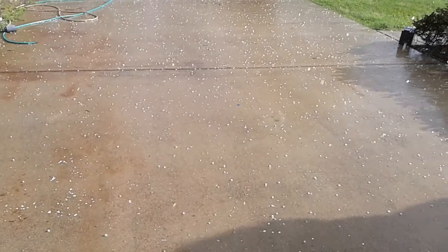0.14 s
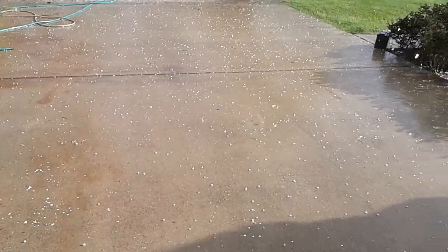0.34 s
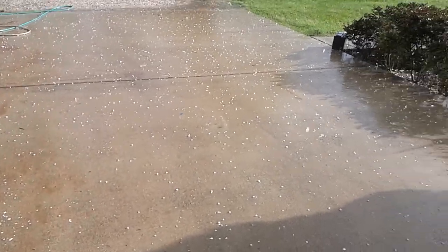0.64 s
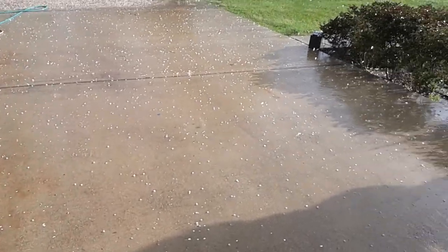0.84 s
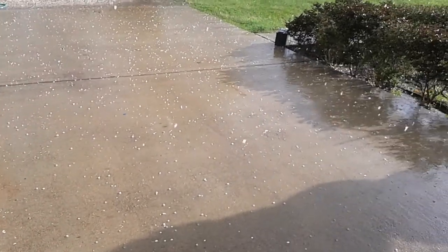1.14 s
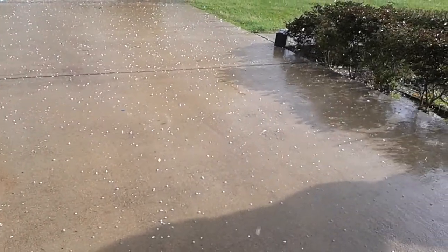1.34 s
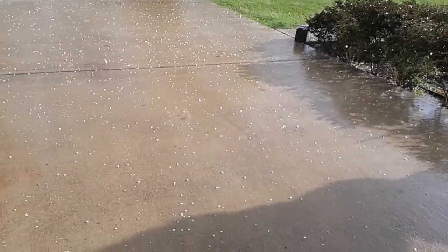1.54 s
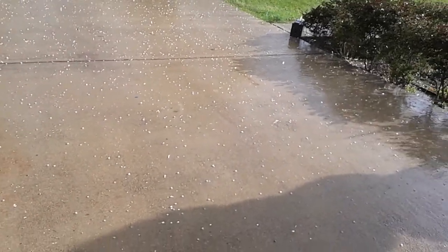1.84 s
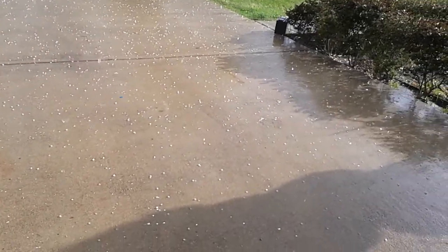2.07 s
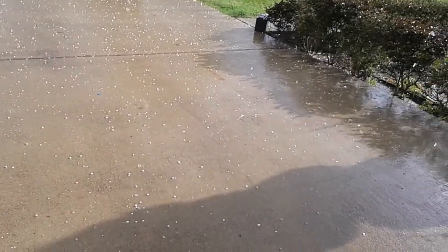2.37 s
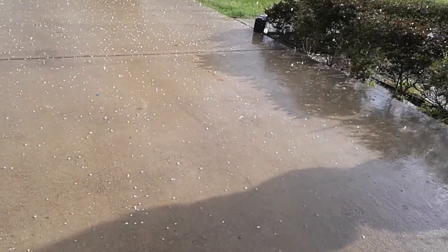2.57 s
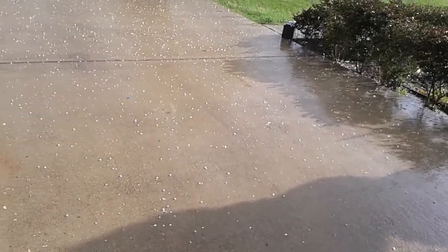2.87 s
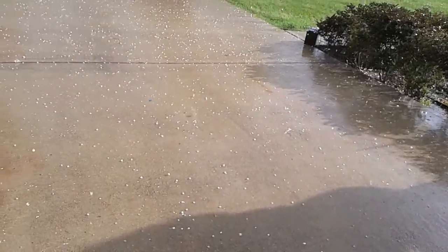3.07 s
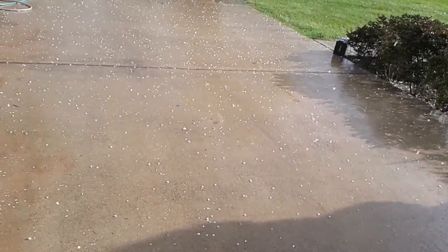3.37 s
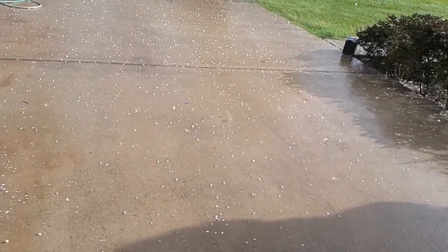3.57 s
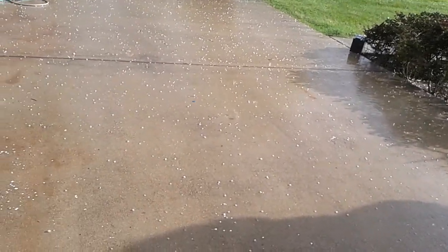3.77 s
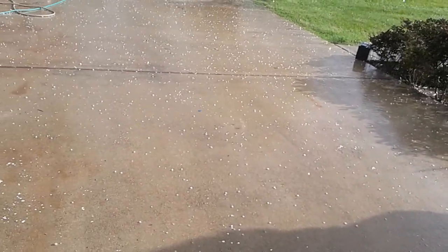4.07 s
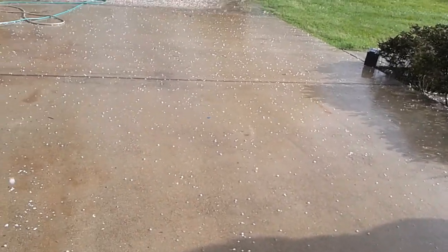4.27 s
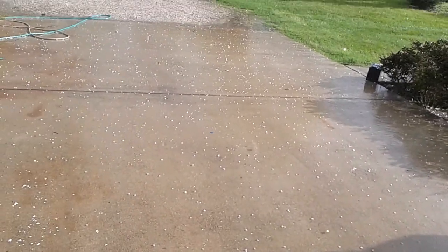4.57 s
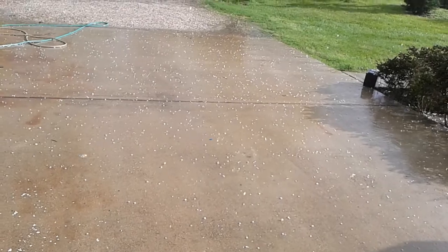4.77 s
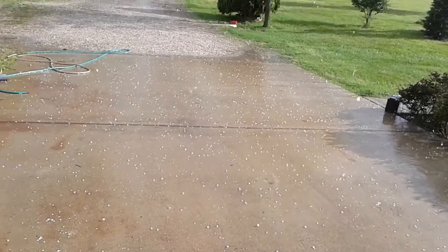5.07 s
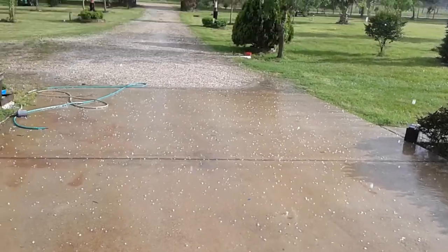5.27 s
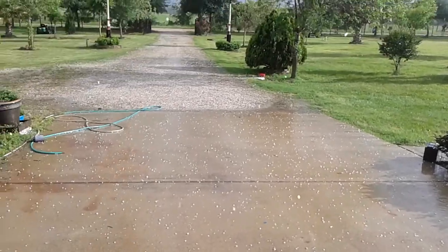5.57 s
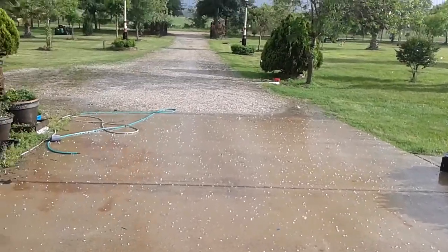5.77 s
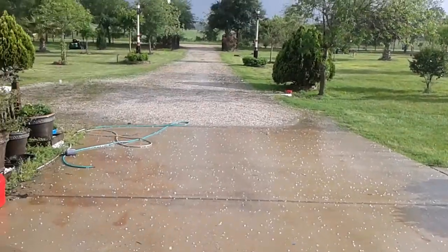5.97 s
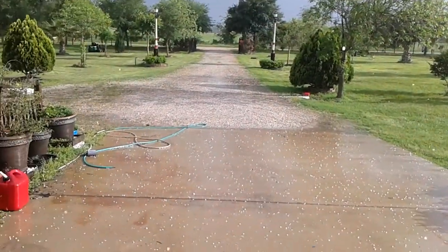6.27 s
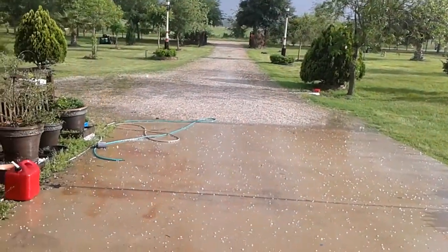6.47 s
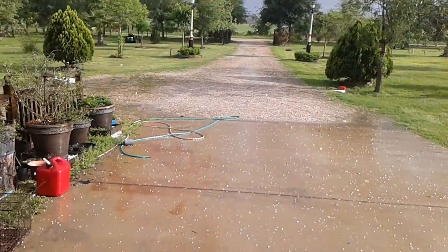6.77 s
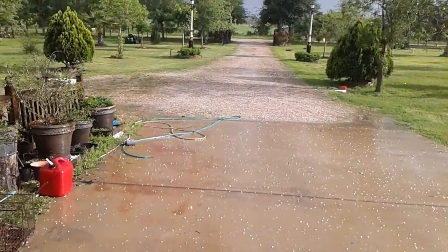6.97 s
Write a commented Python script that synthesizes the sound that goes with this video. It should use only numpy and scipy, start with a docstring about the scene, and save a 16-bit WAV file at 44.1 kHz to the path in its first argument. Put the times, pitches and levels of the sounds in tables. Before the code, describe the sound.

Small hail and rain fall on a wet concrete driveway, heard in bright, crisp stereo from the mouth of a garage with a short, dull echo. At 0 s it is dense: a broad far hiss, low roof murmur, quick pattering and sharp icy ticks, strong near 0.2, 0.3 and 0.5 s. From 0.8 s, just after which a panel clacks, it thins to lighter hiss and scattered clicks until 2 s. Then bursts return, around 2.2 and 2.9 s, with close cracks, fizzing little splashes and rattling panel clacks. Between 3 and 5 s uneven patter continues, with faint pings from struck objects and hard ticks around 4.3 to 4.7 s. It eases near 5.3 s. The hardest, hollow knock lands at 5.8 s; close ticks crowd together around 6.4 s, and more clacks at 6.8 s lead into steady patter through 7 s.

```python
"""Small hail and rain fall on a concrete driveway, heard from the mouth of a garage.
It opens dense, over a far hiss and a low roof murmur, and thins out from about 0.8 s.
From 2 s it comes back in bursts, with nearer stones pattering and the closest ticking or splashing.
Throughout, big stones clack on the building's panels; the hardest knock comes at 5.8 s.
Close ticks crowd together around 6.4 s. Stones are filtered clicks; the rest is shaped noise and tones."""
import sys
import numpy as np
from scipy import signal
from scipy.fft import rfft, irfft
from scipy.io import wavfile
from scipy.ndimage import uniform_filter1d, minimum_filter1d

SR = 44100
rng = np.random.default_rng(int(sys.argv[2]) if len(sys.argv) > 2 else 0)


def wav_out(sig):
    """Save sig, one row per channel (or a flat mono array), as 16-bit PCM at SR to the path in sys.argv[1]."""
    wavfile.write(sys.argv[1], SR, np.round(np.clip(np.atleast_2d(sig).T, -1, 1) * 32767).astype(np.int16))


N = 314433  # length in samples
PORT_DELAY_S = .00039  # sound's travel time from one microphone port to the other


def amp(db):
    """Turns decibels into a gain."""
    return 10 ** (np.asarray(db) / 20)


def unit_rms(x):
    """Scales a sound to a mean power of one."""
    return x / np.sqrt(np.mean(x ** 2) + 1e-20)


def read(points, hz):
    """Reads a table of (Hz, value) along a logarithmic pitch axis."""
    f, value = np.transpose(points)
    return np.interp(np.log(hz + 1), np.log(f), value)


def curve(points):
    """Reads a table of (seconds, value) at every sample."""
    return np.interp(np.arange(N) / SR, *np.transpose(points))


def add(mix, s, sound):
    """Mixes a stereo sound in at s seconds."""
    part = mix[:, max(round(s * SR), 0):][:, :sound.shape[1]]
    part += sound[:, :part.shape[1]]


def colour(x, points, size=2048):
    """Filters with the given (Hz, dB) response; nothing sounds before its cause."""
    log_gain = np.log(amp(read(points, abs(np.fft.fftfreq(size, 1 / SR)))))
    # minimum phase: the phase follows from the log gain
    taps = np.fft.ifft(np.exp(np.conj(signal.hilbert(log_gain)))).real
    return signal.oaconvolve(x, taps[None, :size // 2], axes=1)[:, :x.shape[1]]


def diffuse(size):
    """Noise from all sides: alike at both ports in the bass, mostly unrelated in the treble."""
    a, b = rfft(rng.standard_normal((2, size)))
    same = np.sinc(2 * PORT_DELAY_S * np.fft.rfftfreq(size, 1 / SR)) * .96
    return irfft(np.array([a, same * a + np.sqrt(1 - same ** 2) * b]), size)


def wander(per_s):
    """A random curve of unit rms that heads for a new value per_s times a second."""
    knots = rng.standard_normal(N // 16)
    return unit_rms(np.interp(np.arange(N) / SR * per_s, np.arange(len(knots)), knots))


# How loud the roof drums over time. Each row: time in seconds, relative level in dB.
ROOF_LEVEL = [(0, -40), (.62, -45.5), (1.35, -56.5), (2.25, -46), (2.85, -50.5), (3.7, -46.5),
              (4.65, -51.5), (5.6, -50), (5.88, -43), (6.3, -47), (7.13, -41.5)]
# What the roof lets through. Each row: frequency in Hz, gain in dB.
ROOF_COLOUR = [(20, -30), (40, -54), (60, -8), (90, -0.5), (120, 3.5), (170, -1), (230, -8.5), (400, -11),
               (1000, -19.5), (4000, -89)]


def drumming(db=3):
    """The roof passes on only the low murmur of the stones: noise stripped of its treble."""
    murmur = unit_rms(colour(diffuse(N), ROOF_COLOUR, size=8192))
    return murmur * amp(db + curve(ROOF_LEVEL))


# Tone of the far hiss. Each row: frequency in Hz, gain in dB.
HISS_COLOUR = [(40, -21.5), (250, 2.5), (550, 2), (1000, 2.5), (1550, 4.5), (2000, 9), (3000, 4.5),
               (4500, 5), (8000, -2.5), (15000, -6.5)]


def hiss(level, db=-8, per_s=60, swell=1.0, fade_s=0.019, grain_db=1.5):
    """Far stones and rain, too many to tell apart; larger ones lift the hiss at once, then it fades."""
    lands = (rng.random(N) < per_s / SR) * np.minimum(rng.exponential(1, N), 3)
    power = 1 + swell * signal.lfilter([1], [1, -np.exp(-1 / (fade_s * SR))], lands)
    steady = colour(diffuse(N), HISS_COLOUR)
    return steady * amp(db + level + grain_db * wander(600)) * np.sqrt(power)


def ring(hz, t60, split=0.0447, rise_s=0.00091, size=6144):
    """Something small and hard rings in a close pair of modes, blurred by its own rattling."""
    t = np.arange(size) / SR
    late = t + PORT_DELAY_S * rng.random((2, 1))
    upper = hz * (1 + split * rng.uniform(0.67, 1.55))
    # the pitch jitters at random, which widens each mode
    width_hz = 60 + .06 * hz
    blur = np.cumsum(rng.standard_normal((2, size)), axis=1) * np.sqrt(2 * np.pi * width_hz / SR)
    main_mode = np.sin(2 * np.pi * hz * late + blur[0])
    upper_mode = .5 * np.sin(2 * np.pi * (upper * late + rng.random()) + blur[1])
    return (main_mode + upper_mode) * (1 - np.exp(-t / rise_s)) * amp(-60 * t / t60)


def plinks(level, low_hz, high_hz, per_s, db, t60, spread_db=0.5, count=900):
    """Faint rings at random moments, each at a pitch of its own."""
    out = np.zeros((2, N))
    chances, pitches, sizes = rng.random((count, 3)).T
    starts = np.cumsum(-np.log(1 - chances)) / per_s
    for s, pitch, bulk in zip(starts, pitches, sizes):
        if s < N / SR:
            hz = low_hz * (high_hz / low_hz) ** pitch
            plink_db = db + level[int(s * SR)] + spread_db * 2 * (bulk ** 2 + 1.0)
            add(out, s, ring(hz, t60, size=3072) * amp(plink_db))
    return out


def stone(bright_db, pan_db, shatter=.13, shatter_s=.001, ring=.2, ring_s=.0006, size=320):
    """One impact: a sharp contact, cracking ice and a brief ring, higher for small bright stones."""
    t, hz = np.arange(size) / SR, np.fft.rfftfreq(size, 1 / SR)
    bright_db = np.clip(bright_db, -8, 12)
    ring_hz = 5100 * 2 ** (bright_db / 48 + rng.uniform(-0.35, 0.27))
    crack = (t == 0) + shatter * rng.standard_normal(size) * np.exp(-t / shatter_s)
    spectrum = rfft(crack + ring * np.cos(2 * np.pi * ring_hz * t) * np.exp(-t / ring_s))
    # strength is reckoned in one band, before the tilt in dB per octave
    spectrum /= np.sqrt(np.mean(abs(spectrum[(hz > 3500) & (hz < 6000)]) ** 2))
    spectrum *= amp(bright_db * np.log2(np.clip(hz, 4000, 10000) / 4600))
    # the nearer port hears it louder and sooner
    side = np.array([[1], [-1]])
    delay = PORT_DELAY_S * (1 - side * np.clip(pan_db / 10, -1, 1) ** 3 / 2)
    return irfft(spectrum * np.exp(-2j * np.pi * hz * delay), size) * amp(side * pan_db / 2)


# Tone of the nearer stones. Each row: frequency in Hz, gain in dB.
PATTER_COLOUR = [(100, -1.5), (800, 1.5), (2000, -10), (4500, 7.5), (8000, -4.5), (15000, -4)]


def patter(level, per_s, db, spread_db, count=32):
    """Stones land at random; each kind has its own crack and direction, small ones outnumber large."""
    out = np.zeros((2, N))
    lands = rng.random(N) < per_s / SR
    bulk = np.minimum(rng.exponential(1, N), 2.5)
    sizes = amp(db + level + spread_db * bulk) * lands
    kind = rng.integers(0, count, N)
    for k, bright_db in enumerate(np.linspace(-4, 6, count)):
        impact = stone(bright_db, rng.normal(0, 2.4))
        left, right = signal.oaconvolve((sizes * (kind == k))[None], impact, axes=1)[:, :N]
        # they fall on all sides, so either port may lead
        out += [np.roll(left, round(rng.uniform(-1, 1) * PORT_DELAY_S * SR)), right]
    return colour(out, PATTER_COLOUR)


# Stones that set something ringing, such as pots or trim; the low rows (below about 1 kHz) are panels ringing
# under big knocks. # Each row: start in seconds, pitch in Hz, relative level in dB.
PING_HITS = [(.117, 2415, -17.5), (2.284, 4560, -18), (2.333, 1760, -23), (2.575, 1012, -20.5),
             (3.546, 1770, -17.5), (3.609, 2090, -21.5), (3.648, 1980, -23.5), (3.967, 1954, -20),
             (4.134, 2030, -17), (4.738, 510, -26.5), (5.795, 412, -22), (6.282, 1986, -17.5),
             (6.503, 480, -26.5), (6.566, 478, -24.5), (6.775, 906, -20), (6.807, 2020, -15)]


def pings(db=-1, t60=.09):
    """The clearest rings: stones that hit a loose object, and panels ringing low under some big knocks."""
    out = np.zeros((2, N))
    for s, hz, level_db in PING_HITS:
        add(out, s, ring(hz, t60) * amp(db + level_db))
    return out


# Big stones on the panels. Each row: start in seconds, strength in dB,
# hardness in dB (a harder blow has more clack and rattle and less thump).
PANEL_KNOCKS = [(.038, -23, -10), (.123, -24.5, -5), (.618, -26.5, -2.5), (0.8579, -19, -1),
                (2.32, -18.5, -1), (2.464, -20, 1.5), (2.548, -23, -4.5), (2.572, -24.5, -3.5),
                (2.832, -28, -4), (2.921, -26, 4.5), (3.172, -26, 0.5), (3.538, -23.5, -1),
                (3.608, -30.5, -3), (3.694, -18.5, -3.5), (3.95, -25.5, 0), (4.047, -20, -0.5),
                (4.122, -24.5, -1.5), (4.302, -25, 2.5), (4.58, -20, -0.5), (4.735, -30.5, 1.5),
                (4.864, -26.5, -5), (5.014, -25, -2.5), (5.383, -27.5, 2.5), (5.791, -12.5, -5.5),
                (6.277, -22.5, -1), (6.501, -29, -17), (6.563, -20.5, -1), (6.77, -17.5, -1.5),
                (6.806, -18, -5.5), (6.913, -26.5, -1), (7.1, -26, -0.5)]
# The panels' low modes, before a small random shift. Each row: pitch in Hz, level in dB.
LOW_MODES = [(332, -16), (408, -2.5), (507, -1.5), (549, 3.5), (646, -4.5), (908, -5), (1023, 3.5),
             (1195, -12), (1590, -9)]
# The panels' dense ringing. Each row: frequency in Hz, gain in dB.
BODY_COLOUR = [(60, -69), (200, -12), (400, -9), (800, 4.5), (1300, 2.5), (2500, -8), (5000, -82),
               (15000, -77)]
# The panels' bright rattle. Each row: frequency in Hz, gain in dB.
RATTLE_COLOUR = [(40, -34), (200, -0.5), (900, -17), (2000, 6), (4000, 4.5), (6500, 0.5), (9000, -6.5),
                 (15000, -10)]
# The clack of stone meeting panel. Each row: frequency in Hz, gain in dB.
CLACK_COLOUR = [(60, -40), (400, -4), (900, -2), (2000, 1), (5000, -15), (15000, -28)]
REBOUND_S, REBOUND_DB = .011, -4.5  # chatter: average time between contacts, change at each
BOUNCE_S, BOUNCE_DB = .075, -16  # the stone lands again about this much later, and weaker
WALL_S, WALL_DB, WALL_T60 = 0.015, -3, 0.08  # the back wall's return: delay, level, decay in s
THUMP_T60_S = .17
THUMP_PER_HARDNESS = -0.71  # dB of thump for each dB of hardness


def knocks(body_db=2.0, rattle_db=0.5, thump_db=-17.0, clack_db=30, rise_s=0.0017,
           soft_rise_s=0.00032, body_t60=0.27, rattle_t60=0.26, grain_db=3.0, spot_db=0.5,
           count=4, size=16384):
    """Big stones clack and chatter; panel modes swell, slower if soft, and vary from spot to spot."""
    t = np.arange(size) / SR
    body, rattle, thump, clack = np.zeros((4, 2, N))
    for start, strength_db, hard_db in PANEL_KNOCKS:
        rise = 1 - np.exp(-t / (rise_s + soft_rise_s * np.clip(-hard_db, 0, 10)))
        bright_db = strength_db + hard_db

        gaps = REBOUND_S * rng.uniform(.5, 1.5, count)
        for k, s in enumerate(start + np.cumsum(gaps) - gaps[0]):
            contact_db = clack_db + bright_db + k * REBOUND_DB
            add(clack, s, stone(0, rng.normal(0, 6.1)) * amp(contact_db))

        again = start + BOUNCE_S * rng.uniform(.7, 1.3)
        for s, db in (start, strength_db), (again, strength_db + BOUNCE_DB):
            add(body, s, diffuse(size) * rise * amp(body_db + db - 60 * t / body_t60))
            rattle_fade = amp(rattle_db + db + hard_db - 60 * t / rattle_t60)
            add(rattle, s, diffuse(size) * rise * rattle_fade)
        wall_fade = amp(WALL_DB + bright_db - 60 * t / WALL_T60)
        add(rattle, start + WALL_S, diffuse(size) * rise * wall_fade)

        low_db = thump_db + strength_db + THUMP_PER_HARDNESS * hard_db
        for hz, db in LOW_MODES:
            late = t + PORT_DELAY_S * rng.uniform(-0.69, 1.0, (2, 1))
            turns = hz * rng.uniform(0.94, 1.04) * late + rng.random()
            mode_db = low_db + db + spot_db * rng.uniform(-4.2, 1)
            add(thump, start, np.sin(2 * np.pi * turns) * rise * amp(mode_db - 60 * t / THUMP_T60_S))
    grain = amp(grain_db * wander(450))
    ringing = colour(body * np.sqrt(grain), BODY_COLOUR) + colour(rattle * grain, RATTLE_COLOUR)
    return colour(clack, CLACK_COLOUR) + ringing + thump


# Stones that burst into ice and water. Each row: start in seconds, relative level in dB.
BURSTS = [(0.102, -42.5), (0.192, -44.5), (0.619, -43), (2.215, -38), (2.258, -39), (2.469, -40),
          (2.835, -41), (3.951, -36.5), (4.056, -45), (4.866, -37.5), (5.389, -39.5), (6.558, -45),
          (6.691, -39.5)]
# The fizz of a splash. Each row: frequency in Hz, gain in dB.
SPRAY_COLOUR = [(500, -4.5), (2500, 20), (5000, 20.5), (8000, 18), (15000, 14.5)]


def splashes(db=-1, rise_s=0.00023, t60=0.23, grain_db=3, size=8192):
    """Fragments and droplets scatter over the wet concrete in a short, grainy fizz."""
    t, out = np.arange(size) / SR, np.zeros((2, N))
    for s, level_db in BURSTS:
        fade = (1 - np.exp(-t / rise_s)) * amp(db + level_db - 60 * t / t60)
        add(out, s, diffuse(size) * fade)
    return colour(out * amp(grain_db * wander(700)), SPRAY_COLOUR)


# Close stones on the concrete. Each row: time in seconds, strength in dB,
# brightness in dB per octave (stone() limits it), left minus right in dB.
CLOSE_STONES = [(0.0095, 0.5, -7, 2), (0.0316, 7, -7, 5.5), (0.0715, 4.5, 4, 3.0), (0.1764, 14, -2, 4.5),
                (0.2477, 0, -11, 5), (0.33, 17, -6.5, 2.5), (0.3751, -1, 3, 6), (0.3932, 1.5, 4, 3),
                (0.4399, 0, 0, -1), (0.447, 2.5, -10, 0), (0.4743, 0, -11, 4.5), (0.5106, 16, -0.5, 4),
                (0.5774, -3, -2, 1.0), (0.6246, 4.5, 4, -5), (0.8118, 3, -0.5, 1.5), (0.8575, 6.5, 1, -6),
                (1.0656, 0, 0.5, 4), (1.5279, -3, 1, 1.5), (1.6837, -2, 2.5, 2), (1.7373, -3.5, 6.5, 2),
                (1.9929, 4, 3, 3), (2.152, 14, 2.5, 7), (2.1696, 3.5, -1, 2), (2.3205, 14, 2, 5),
                (2.464, 10.5, 0, -14), (2.4713, 12, -16, 6.5), (2.6027, 3.5, 1, -1.0),
                (2.6577, 7.5, 3, 3.5), (2.7406, 5, -2, -5), (3.1086, 4, 0, 6.5), (3.4783, 8, -9, -9),
                (3.5452, 6, -2, 6.5), (3.5496, 13, -1, 3.5), (3.6084, 5, -12, -4.5), (3.6965, 1.5, -5, 6),
                (3.7375, 4.5, -11, 1), (3.9512, 10, 1.5, 1), (3.959, 6.5, 0, 7.5), (4.0474, -2, -7, -3),
                (4.0843, 6, 2, 4.5), (4.1295, 5, -4.0, 3), (4.1873, -7, -6, -1), (4.3024, 14.5, -12, 2),
                (4.4054, -2.5, 8, 5), (4.58, 14, 10, -5.5), (4.6377, 12.5, 12.5, 6.0), (4.6597, 10, -9, -5),
                (4.8174, 2.5, -7.0, 2), (4.8643, 5, 15, -4), (4.974, 1, 3.5, 1), (5.0222, -7, 6.5, 5.5),
                (5.1803, 4.5, -7.5, 6), (5.345, -3, 0.5, 1), (5.394, 8, -3, -7.5), (5.4894, 0, -2, 5),
                (5.6095, 5, -4, 2.5), (5.6444, 3.5, -0.5, 5.5), (5.7384, 2.5, 9, 6), (5.7813, -4, -9, -1.5),
                (5.8202, 0, -2, 8), (5.8356, 13, -3, -8), (5.9358, 1, -10, -3), (5.9803, -0.5, 1, 9),
                (6.0038, -3, -4, 6), (6.1728, 1.5, -1, 6), (6.2408, -2, 10, -1), (6.2971, 10.5, -3.5, 2.5),
                (6.3589, 7.5, -8, 3.5), (6.3651, 8.5, 1, 6.5), (6.4112, -12, -3, 0), (6.426, 13.5, 0, 6),
                (6.4534, 5.5, -1.5, 0), (6.4781, -1, 7.5, 6), (6.492, 8.5, 6, 6), (6.5048, 6, 0.5, 2),
                (6.5585, 9, 9, -6), (6.8084, 7, 0, 3.5), (6.8856, 2.5, -2, 3), (6.9896, 5, -0.5, 0.0),
                (7.0408, 1, -4, 7.5), (7.0678, 3, 1, -3), (7.0755, 3.5, 1, 0)]
# The crack of a close stone. Each row: frequency in Hz, gain in dB.
CRACK_COLOUR = [(50, -31), (700, -17), (2000, -2.5), (3500, -0.5), (6000, 0.5), (10000, -8), (15000, -1.5)]


def ticks():
    """The closest stones, each a separate impact with more shattering ice."""
    out = np.zeros((2, N))
    for s, strength_db, bright_db, pan_db in CLOSE_STONES:
        impact = stone(bright_db, pan_db, shatter=.25, shatter_s=.001, ring=.18, ring_s=.0007)
        # start early to make up for the delay inside stone()
        add(out, s - PORT_DELAY_S, amp(strength_db) * impact)
    return colour(out, CRACK_COLOUR)


# How long the garage echoes. Each row: frequency in Hz, time to fall 60 dB in seconds.
GARAGE_DECAY = [(150, 0.48), (1000, 0.44), (5000, 0.11), (14000, 0.024)]


def garage(x, first_s=0.002, size=22050):
    """Sparse reflections off floor and walls, the treble dying first."""
    reflects = rng.random((2, size)) < 2500 / SR  # about 2500 reflections a second
    taps = rng.standard_normal((2, size)) * reflects * (np.arange(size) > first_s * SR)
    hz, t, z = signal.stft(taps, SR, nperseg=256)
    fade = amp(-60 * t / read(GARAGE_DECAY, hz)[:, None])
    tail = signal.istft(z * fade, SR, nperseg=256)[1]
    tail /= np.linalg.norm(tail, axis=1, keepdims=True)
    return signal.oaconvolve(x, tail, axes=1)[:, :N]


# How hard it falls. Each row: time in seconds, relative level in dB.
FALL_LEVEL = [(0, -24.5), (.2, -26), (.42, -26), (.58, -25.5), (.8, -30), (1.03, -33.5), (1.2, -34),
              (1.37, -32.5), (1.64, -34.5), (2.02, -25), (2.27, -22.5), (2.5, -27.5), (2.67, -32),
              (2.88, -23), (3.06, -31), (3.15, -25), (3.29, -31), (3.6, -25.5), (3.95, -25), (4.4, -28.5),
              (4.55, -30), (4.65, -30), (4.87, -28.5), (5.27, -32.5), (5.87, -26), (6.15, -27),
              (6.55, -24.5), (7.13, -27)]


def scene(patter_room_db=-7, tick_room_db=-8):
    """Hail at three distances, the things it rings, the building's sounds, and the garage's echo."""
    level = curve(FALL_LEVEL)
    background = drumming() + hiss(level)
    rings = plinks(level, 3500, 7500, per_s=60, db=-3.5, t60=.04) + pings()
    # many weaker stones and fewer stronger ones
    stones = patter(level, per_s=300, db=7.5, spread_db=3.0)
    stones += patter(level, per_s=70, db=14.5, spread_db=4.0)
    close = ticks()
    echo = garage(amp(patter_room_db) * stones + amp(tick_room_db) * close)
    return background + rings + stones + knocks() + splashes() + close + echo


# Tone of the two microphone ports. Each row: frequency in Hz, left gain in dB, right gain in dB.
PORT_COLOUR = [(102, -5.5, -6), (583, .5, 0), (890, -1, -2), (1330, 1.5, -2), (1830, 7.3, -.5),
               (2200, 2.5, -3), (2700, 1.5, -2), (3590, 2.2, -.2), (4000, 4.8, -1), (4300, 9.3, .3),
               (4670, 13.4, 2.5), (5000, 11.5, 5.3), (5350, 5.8, 6.2), (5800, 2, 3), (6400, -2.5, 7.7),
               (7500, -5, 4.8), (8600, -4.5, 4), (10660, -12.5, 1), (15200, -5, -13.5)]
EDGE_HZ = 14900  # top of the band
# limiter: rms threshold (of full scale), look ahead and behind (s), share of the excess dB removed
LIMIT, LIMIT_S, LIMIT_SHARE = .42, .012, .58


def record(dry):
    """Ports add resonances; a limiter ducks around loud peaks, whose tips may clip; the top is cut."""
    ports = np.array(PORT_COLOUR)
    heard = np.vstack([colour(dry[c:c + 1], ports[:, [0, c + 1]]) for c in range(2)])
    low_pass = signal.firwin(255, EDGE_HZ, window=("kaiser", 8), fs=SR)
    heard = signal.oaconvolve(heard, low_pass[None], "same", axes=1)
    reach = round(LIMIT_S * SR)
    # loudness over 1 ms, taken from the louder port
    loudness = np.sqrt(abs(uniform_filter1d(heard ** 2, size=44, axis=1))).max(0)
    allowed = (LIMIT / np.maximum(loudness, LIMIT)) ** LIMIT_SHARE
    gain = uniform_filter1d(minimum_filter1d(allowed, 2 * reach + 1), reach)
    overloaded = np.clip(heard * gain, -.85, .85)
    return signal.oaconvolve(overloaded, low_pass[None], "same", axes=1)


dry = scene()
out = record(dry)
wav_out(out)
```